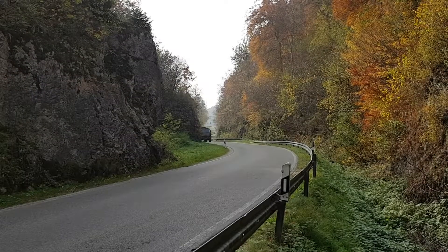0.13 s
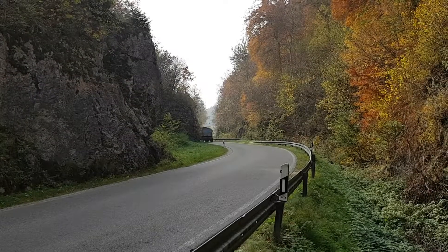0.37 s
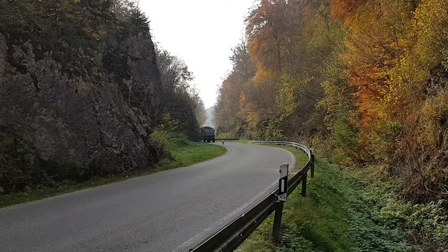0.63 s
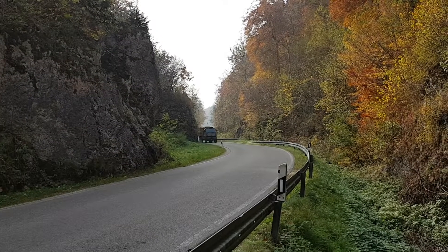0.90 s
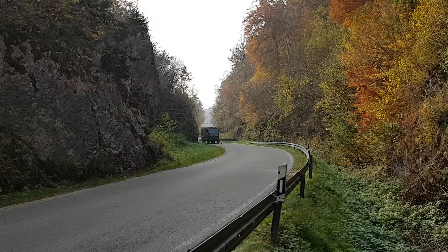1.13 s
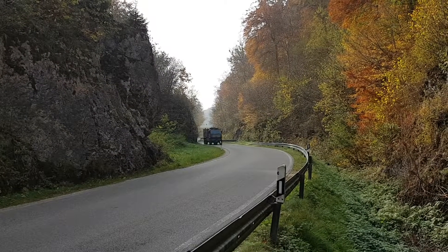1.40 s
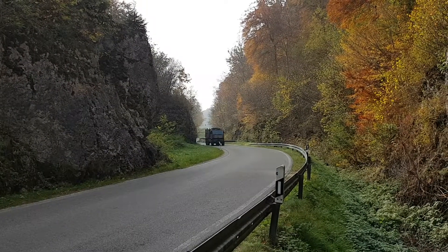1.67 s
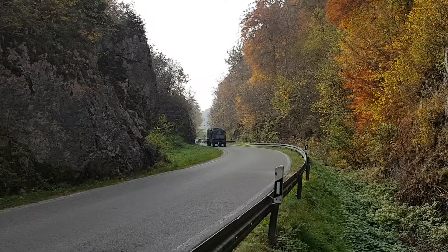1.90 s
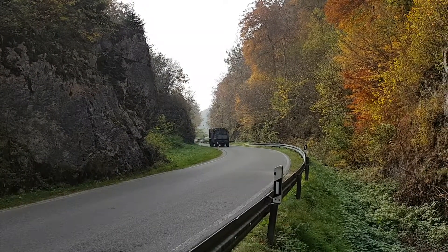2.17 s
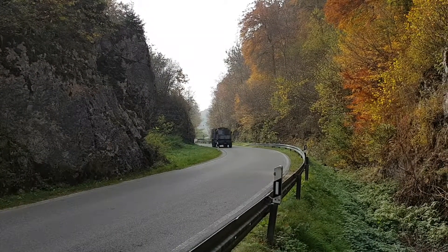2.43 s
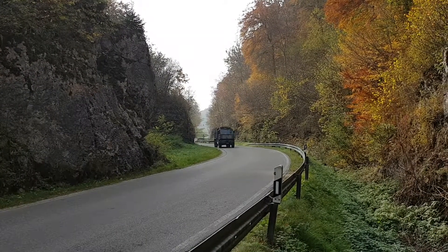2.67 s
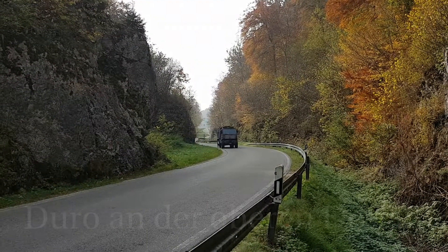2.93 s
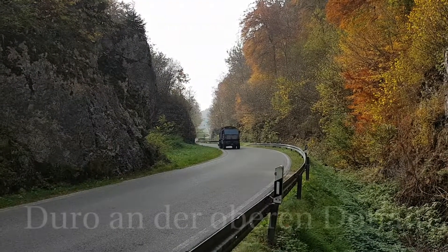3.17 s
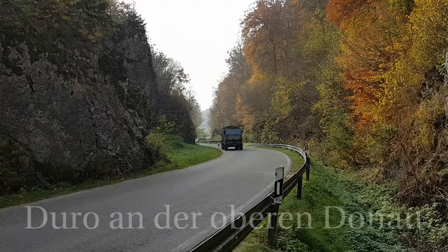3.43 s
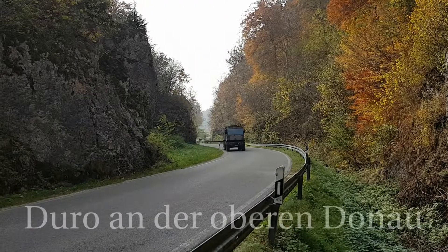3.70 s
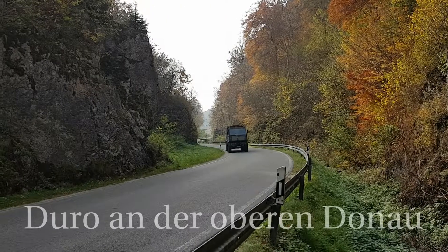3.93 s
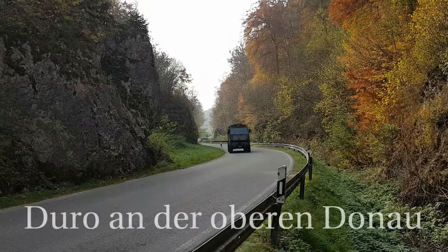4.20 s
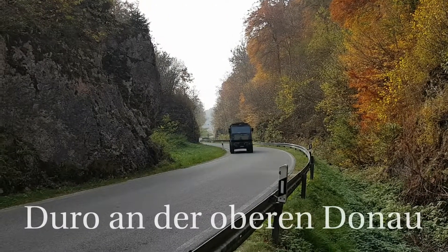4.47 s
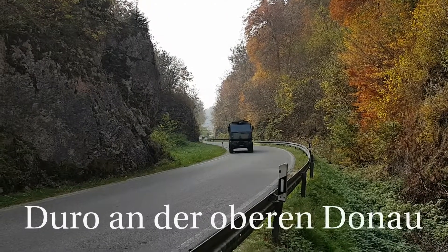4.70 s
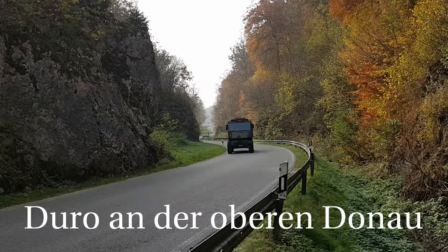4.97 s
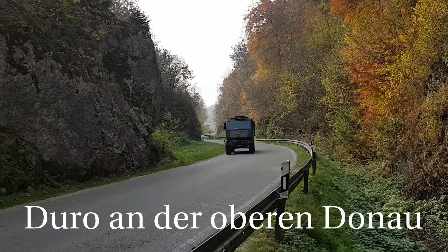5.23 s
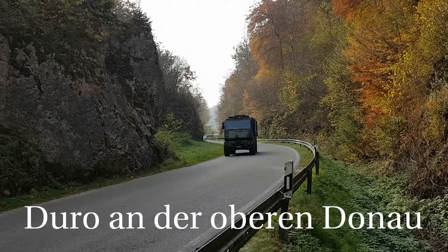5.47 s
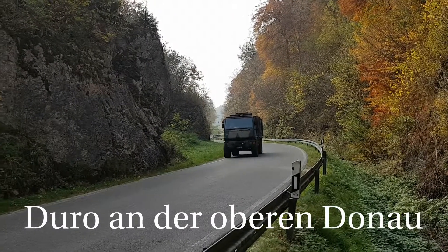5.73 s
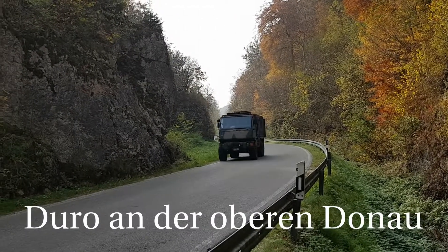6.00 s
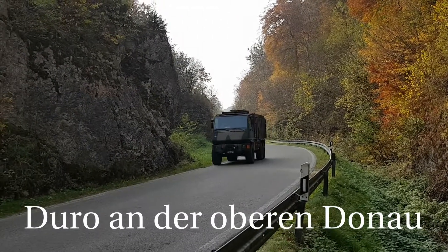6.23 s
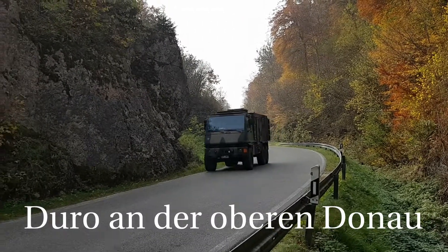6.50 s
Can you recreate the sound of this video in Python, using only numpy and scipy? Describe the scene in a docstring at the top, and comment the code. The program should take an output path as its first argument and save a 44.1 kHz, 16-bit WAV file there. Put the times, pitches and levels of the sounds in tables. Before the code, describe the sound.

A heavy diesel truck nears along a wooded road, tyre hum and roar swelling, sagging in pitch through a bend, then rising again.

```python
"""A roadside at a bend beside a rock face: a heavy diesel truck on block-tread tyres comes toward a microphone.
It eases off in the bend and pulls away again. Tread hum and exhaust note are sines that sag and rise together;
a fan drones at constant speed. Road roar and engine clatter are shaped noise that swells as the truck nears,
with a weak echo. Two small ticks sound close by, over a faint breeze and the hiss of the microphone."""
import sys
import numpy as np
from scipy import signal
from scipy.fft import rfft, irfft
from scipy.io import wavfile

SR = 44100
rng = np.random.default_rng(int(sys.argv[2]) if len(sys.argv) > 2 else 0)


def dump(signal):
    """Clip the signal to [-1, 1] and save it as 16-bit WAV at the path in sys.argv[1]."""
    limited = np.clip(np.atleast_2d(signal).T, -1, 1)
    pcm = np.round(limited * 32767).astype(np.int16)
    wavfile.write(sys.argv[1], SR, pcm)


def how_loud(loudness_db):
    """Turn decibels into a plain amplitude multiplier (0 dB gives 1, 20 dB gives 10)."""
    steps = np.asarray(loudness_db, float) / 20
    return 10 ** steps


N = 291942  # length in samples


def curves(rows):
    """Turn the columns of a table into curves in time; the first column is the time in seconds."""
    time_s, *columns = np.transpose(rows)
    return [np.interp(np.arange(N) / SR, time_s, column) for column in columns]


def rms_one(x):
    """Scale to unit rms."""
    return x / np.sqrt(np.mean(x ** 2) + 1e-20)


def wander(rate_hz):
    """Slow random curve with spread 1: noise through two equal one-pole low-passes."""
    step = 40  # samples between computed points
    settle = 4000  # points thrown away while the filter settles
    pole = np.exp(-2 * np.pi * rate_hz * step / SR)
    white = rng.standard_normal(N // step + settle + 2)
    slow = signal.lfilter([1], [1, -2 * pole, pole * pole], white)[settle:]
    return np.interp(np.arange(N) / step, np.arange(len(slow)), rms_one(slow))


def noise(spectrum):
    """White noise given the shape of a spectrum table, at unit rms."""
    hz, db = np.transpose(spectrum)
    bins_hz = np.maximum(np.arange(N // 2 + 1) * SR / N, 1)
    shape = how_loud(np.interp(np.log(bins_hz), np.log(hz), db, left=-90, right=-90))
    return rms_one(irfft(rfft(rng.standard_normal(N)) * shape, N))


def bump(center_s, lift_db, spread_s):
    """A bell-shaped change of level in dB."""
    distance = (np.arange(N) / SR - center_s) / spread_s
    return lift_db * np.exp(-0.5 * distance ** 2)


def bumps(rows):
    """All level changes of a table, added up in dB."""
    return sum(bump(*row) for row in rows)


def partial(turns, multiple, db, flutter_db, wobble_rad):
    """One sine of a rotating part; air and echoes make its height and phase waver."""
    phase = 2 * np.pi * (multiple * turns + rng.random()) + wobble_rad * wander(4.6)
    level = how_loud(db + flutter_db * wander(6.5))
    return np.sqrt(2) * level * np.sin(phase)  # the root turns an rms level into a peak


def orders(turns, rows, swells, swing_db, flutter_db, wobble_rad):
    """Multiples of one rotation, each following the approach and its own swells."""
    out = np.zeros(N)
    for multiple, db, follows in rows:
        own_swells = [(s, lift, spread) for s, line, lift, spread in swells if line == multiple]
        line_db = db + follows * swing_db + bumps(own_swells)
        out += partial(turns, multiple, line_db, flutter_db, wobble_rad)
    return out


# Wooded cutting in a light, steady breeze: pitch_hz [Hz], relative level_db [dB per Hz]
BREEZE_SPECTRUM = [(15, -5.5), (30, -5.5), (50, -6), (100, -13), (300, -27.5)]


def breeze():
    """The cutting stirs: low noise at a constant level."""
    return how_loud(-63.5) * noise(BREEZE_SPECTRUM)


# Snaps near the microphone: start_s [s], level_db [dB], pitch_hz [Hz], width_hz [Hz]
NEAR_TICKS = [(4.0362, -32.5, 5500, 1900), (4.1898, -35, 7300, 2600)]


def ticks():
    """Each tick is a very short snap: a broad resonance with weaker, higher partners."""
    out, t = np.zeros(N), np.arange(300) / SR
    for start_s, level_db, pitch_hz, width_hz in NEAR_TICKS:
        decay = np.pi * width_hz * t
        shape = decay * np.exp(1 - decay)  # quick rise, then fall
        ring = np.zeros(len(t))
        for ratio, size in [(1, 0.7), (1.28, 0.35), (1.6, 0.08)]:
            ring += size * np.sin(2 * np.pi * ratio * pitch_hz * t)
        at = round(start_s * SR)
        out[at:at + len(t)] += how_loud(level_db) * shape * ring
    return out


# Resonances of engine block and cab panels: pitch_hz [Hz], width_hz [Hz], lift_db [dB]
PANEL_RESONANCES = [(2090, 41, 2.5), (2430, 150, 1), (4300, 79, 1), (4720, 90, 1), (6000, 140, 2),
                    (7750, 130, -1.5)]


def panels(x):
    """Each resonance lifts a narrow band of the noise, or cuts it where the lift is negative."""
    for pitch_hz, width_hz, lift_db in PANEL_RESONANCES:
        b, a = signal.iirpeak(pitch_hz, pitch_hz / width_hz, fs=SR)
        x = x + (how_loud(lift_db) - 1) * signal.lfilter(b, a, x)
    return x


def rock_face(x):
    """A weak echo whose lag wanders, so that it combs the noise in a shifting pattern."""
    lag = 0.002387 * SR * (1 + 0.14 * wander(0.42))  # in samples, about 2.4 ms
    echo = np.interp(np.arange(N) - lag, np.arange(N), x)
    return x + how_loud(-16) * echo


# Low road rumble: pitch_hz [Hz], relative level_db [dB per Hz]
RUMBLE_SPECTRUM = [(25, -31), (50, -19), (80, -9.5), (130, -6.5), (160, -3.5), (220, 2), (330, -4.5),
                   (420, -5.5), (600, -46)]
# The rumble swells or thins out: center_s [s], lift_db [dB], spread_s [s]
RUMBLE_CHANGES = [(.5, 1.5, .5), (1.9, 1.5, .3), (3.2, -1, 0.61), (5.05, 1.5, 0.072), (6.3, 1.5, 0.27)]


def rumble(tyre_swing_db, engine_swing_db):
    """Low noise that follows both the tyres and the engine bay."""
    level_db = -40 + 0.62 * tyre_swing_db + 0.41 * engine_swing_db
    level_db = level_db + bumps(RUMBLE_CHANGES) + 0.89 * wander(6.0)
    return how_loud(level_db) * noise(RUMBLE_SPECTRUM)


# Road roar: pitch_hz [Hz], relative level_db [dB per Hz]
ROAR_SPECTRUM = [(250, -41.5), (340, -9.5), (400, -2), (650, 1), (950, -2), (1080, -7), (1400, -14.5),
                 (2000, -52)]
# Tread hiss: pitch_hz [Hz], relative level_db [dB per Hz]
HISS_SPECTRUM = [(700, -30), (950, -12.5), (1200, -0.5), (1450, -3.5), (1700, -7), (2000, -20), (2500, -38)]
# The hiss swells or thins out: center_s [s], lift_db [dB], spread_s [s]
HISS_CHANGES = [(.5, 1.5, .3), (1.75, -2, .25), (2.9, 1, 0.34), (4.4, 3, 0.28), (5.5, -2, 0.32)]


def roar_and_hiss(tyre_swing_db, engine_swing_db):
    """Rubber on road: two bands of noise that waver together."""
    gust = wander(3.0)
    roar_db = -35 + 0.94 * tyre_swing_db + 0.065 * engine_swing_db + 0.82 * gust
    hiss_db = -43.5 + 0.68 * tyre_swing_db + 0.43 * engine_swing_db + 0.5 * gust
    hiss_db = hiss_db + bumps(HISS_CHANGES)
    return how_loud(roar_db) * noise(ROAR_SPECTRUM) + how_loud(hiss_db) * noise(HISS_SPECTRUM)


# Combustion clatter: pitch_hz [Hz], relative level_db [dB per Hz]
CLATTER_SPECTRUM = [(1500, -15), (1850, 0), (2200, -5), (2600, -2), (3000, -7), (3400, -10), (3800, -16.5),
                    (4400, -39)]
# Sizzle above the clatter: pitch_hz [Hz], relative level_db [dB per Hz]
SIZZLE_SPECTRUM = [(3200, -26.5), (3900, -0.5), (4600, 1), (5200, -2.5), (5900, -8.5), (6600, -18),
                   (7400, -32)]
# The sizzle swells or thins out: center_s [s], lift_db [dB], spread_s [s]
SIZZLE_CHANGES = [(.6, 0, .4), (1.9, 1, .4), (3.4, 0, .4), (5.5, -1.5, .35), (6.5, 2, 0.17)]


def clatter_and_sizzle(firings, tyre_swing_db, engine_swing_db):
    """Two bands of noise that pulse a little with each firing."""
    knock = 1 + 0.042 * np.cos(2 * np.pi * firings)
    clatter_db = -47 + 0.05 * tyre_swing_db + 0.97 * engine_swing_db + 0.43 * wander(10.0)
    sizzle_db = -58 + 0.05 * tyre_swing_db + 1.01 * engine_swing_db + bumps(SIZZLE_CHANGES)
    return knock * (how_loud(clatter_db) * noise(CLATTER_SPECTRUM) + how_loud(sizzle_db) * noise(SIZZLE_SPECTRUM))


# Highest treble: pitch_hz [Hz], relative level_db [dB per Hz]
GRIT_SPECTRUM = [(5200, -27), (6000, -3), (6800, 0.5), (7800, -0.5), (9000, -5), (9800, -11),
                 (10400, -19.5), (12500, -20), (15700, -26)]
# It clears and dulls along the way: time_s [s], lift_db [dB, before the share taken below]
TREBLE_CLEARNESS = [(0, -0.5), (.8, -1), (1.8, 0.5), (2.6, 0.7), (3.3, -1.5), (3.9, -2), (4.4, 0.3),
                    (4.7, 1), (5.3, 1.5), (5.8, 1.5), (5.95, -0.5), (6.3, 1), (6.62, 1)]


def grit(tyre_swing_db, engine_swing_db):
    """Faint treble noise that follows the engine bay and clears and dulls."""
    clear_db, = curves(TREBLE_CLEARNESS)
    level_db = -68.5 + 0.05 * tyre_swing_db + 1.07 * engine_swing_db + 0.99 * clear_db
    return how_loud(level_db) * noise(GRIT_SPECTRUM)


def broadband(firings, tyre_swing_db, engine_swing_db):
    """All noise of road and engine, coloured by the panels and echoed by the rock."""
    layers = rumble(tyre_swing_db, engine_swing_db)
    layers = layers + roar_and_hiss(tyre_swing_db, engine_swing_db)
    layers = layers + clatter_and_sizzle(firings, tyre_swing_db, engine_swing_db)
    layers = layers + grit(tyre_swing_db, engine_swing_db)
    return rock_face(panels(layers))


# Fan lines: multiple [of blade rate], level_db [dB at mid approach], follows [share of the tyre swing]
FAN_LINES = [(1, -49.5, 0.5), (2, -51, .5), (3, -50, 1.0), (4, -50.5, 0.64)]
# Single lines swell: center_s [s], multiple [of blade rate], lift_db [dB], spread_s [s]
FAN_LINE_SWELLS = [(.75, 1, 8.5, 0.33), (1.8, 1, 6.3, 0.19), (3.25, 1, 9.5, 0.22), (5.1, 1, 4.5, 0.58),
                   (1.5, 2, 16, 0.083), (1.72, 2, 7.3, .08), (2.1, 2, 11, 0.096), (2.77, 2, 11.2, 0.056),
                   (3.93, 2, 7.4, .1), (5.0, 2, 12, 0.068), (5.3, 2, 8.4, .2), (5.62, 2, 14, 0.078),
                   (5.87, 2, 17.7, 0.071), (6.37, 2, 17, 0.061), (3.0, 3, 5.4, .15), (3.9, 3, 7, 0.31),
                   (5.1, 3, 7, .4), (1.5, 4, 7.6, 0.12), (3.4, 4, 6.7, 0.14), (6.0, 4, 9.6, .45)]


def fan(swing_db):
    """Blade rate and three overtones, unsteady in the turbulent inflow."""
    blades = 91.26 * np.arange(N) / SR  # blade rate in Hz, constant
    return orders(blades, FAN_LINES, FAN_LINE_SWELLS, swing_db, flutter_db=2.0, wobble_rad=0.46)


# Firing note, following load and where the pipe points: time_s [s], level_db [dB]
FIRING_NOTE = [(0, -53), (.6, -50), (.75, -57), (.88, -49), (1.1, -53), (1.38, -45), (1.75, -44),
               (1.9, -56), (2.25, -59), (2.48, -44), (2.7, -59), (3.0, -45), (3.2, -52), (3.4, -46),
               (4.0, -48.5), (4.5, -34.5), (4.65, -40), (4.87, -37), (5.0, -43.5), (5.37, -34),
               (5.6, -35.5), (6.2, -23), (6.4, -25), (6.62, -37)]
# Higher lines: multiple [of firing rate], level_db [dB at mid approach], follows [share of the tyre swing]
EXHAUST_LINES = [(1.5, -52, 0.4), (2, -55, 0.42)]
# Single lines swell: center_s [s], multiple [of firing rate], lift_db [dB], spread_s [s]
EXHAUST_LINE_SWELLS = [(0.83, 1.5, 7, 0.25), (5.3, 1.5, 4, .4), (0.55, 2, 6.2, .4), (4.5, 2, 6, .3),
                       (5.26, 2, 8, 0.27), (6.0, 2, 8, .2), (6.48, 2, 20.7, 0.2), (1.431, 2, 5.8, .15)]


def exhaust(firings, swing_db):
    """Firing note of six cylinders; unequal pipes add a half order."""
    note_db, = curves(FIRING_NOTE)
    note = partial(firings, 0.99, note_db, flutter_db=0.5, wobble_rad=0.11)
    return note + orders(firings, EXHAUST_LINES, EXHAUST_LINE_SWELLS, swing_db, flutter_db=0.5, wobble_rad=0.2)


# The hum dips briefly: center_s [s], lift_db [dB], spread_s [s]
HUM_DIPS = [(3.5, -31, 0.078), (4.36, -14, 0.079)]
# Overtones: multiple [of block rate], level_db [dB at mid approach], follows [share of the tyre swing]
TREAD_LINES = [(2, -45, 0.65), (3, -45.5, 0.64), (4, -48.5, 0.96)]
# Single lines swell or fade: center_s [s], multiple [of block rate], lift_db [dB], spread_s [s]
TREAD_LINE_SWELLS = [(.15, 3, -20, 0.28), (2.4, 3, 2, 0.58), (3.6, 2, 4, 0.21), (4.36, 2, 2.5, 0.21),
                     (5.2, 4, 5, 0.4), (5.7, 2, -9, .2), (5.44, 3, 4, 0.35), (1.14, 4, 5, .15),
                     (4.1, 3, -1.5, .2), (7.7, 3, 6.5, 0.13), (4.3, 4, -3.5, 0.37), (1.2, 3, -1, .3),
                     (6.0, 3, -6, .12), (0.33, 2, -4.5, 0.46)]


def tyres(blocks, hum_db, swing_db):
    """Tread blocks slap the asphalt in step with road speed: a hum and its overtones."""
    hum = partial(blocks, 1, hum_db + bumps(HUM_DIPS), flutter_db=0.15, wobble_rad=0.27)
    return hum + orders(blocks, TREAD_LINES, TREAD_LINE_SWELLS, swing_db, flutter_db=0.6, wobble_rad=0.37)


def gearbox(blocks, engine_swing_db):
    """A whine at 7.3 cycles per tread block, so it glides with the road speed."""
    whine_db = -58.5 + 1.27 * engine_swing_db + bump(5.5, lift_db=12, spread_s=0.18)
    return partial(blocks, 7.3, whine_db, flutter_db=3.0, wobble_rad=2.6)


# Road speed: time_s [s], block_rate_hz [tread blocks per second]
ROAD_SPEED = [(0, 237), (.6, 236.2), (.85, 235.9), (1.0, 235), (1.6, 233.3), (1.9, 233.8), (2.5, 229.9),
              (2.8, 227.6), (3.05, 229), (3.4, 217.7), (3.75, 208.4), (4.0, 204.5), (4.13, 206.4),
              (4.62, 227), (5.0, 236.3), (5.3, 238.1), (5.75, 238.7), (6.12, 246.3), (6.38, 246.6),
              (6.62, 249.5)]
# Approach as heard: time_s [s], tyres_db [dB], engine_bay_db [dB], tread_hum_db [dB]
APPROACH_LEVELS = [(0, -48.5, -55, -45.5), (.5, -45.5, -51, -42), (.85, -43.5, -49.5, -43.5),
                   (1.2, -42.5, -48, -38.5), (1.55, -40.5, -48.5, -37.5), (1.95, -38, -49.5, -36.5),
                   (2.5, -35.5, -48.5, -35.5), (2.9, -34.5, -47, -33.5), (3.15, -33.5, -46.5, -34),
                   (3.7, -34.5, -47, -34), (4.3, -32.5, -46, -34), (4.62, -31.5, -44.5, -30),
                   (5.1, -29.5, -43, -24.5), (5.5, -29, -41, -25.5), (5.83, -27, -40.5, -22.5),
                   (5.95, -25.5, -36.5, -26), (6.27, -25, -36, -21.5), (6.48, -23.5, -35, -19.5),
                   (6.62, -24.5, -33, -22)]


def scene():
    """Wheels and engine are locked by the gear, so one speed drives both."""
    block_hz, = curves(ROAD_SPEED)
    tyres_db, engine_db, hum_db = curves(APPROACH_LEVELS)
    tyre_swing_db = tyres_db + 35  # against -35 dB at mid approach
    engine_swing_db = engine_db + 47  # against -47 dB at mid approach
    blocks = np.cumsum(block_hz) / SR
    firings = 0.3035 * blocks  # firings per tread block
    background = breeze() + ticks()
    truck = broadband(firings, tyre_swing_db, engine_swing_db)
    truck = truck + fan(tyre_swing_db) + exhaust(firings, tyre_swing_db)
    truck = truck + tyres(blocks, hum_db, tyre_swing_db) + gearbox(blocks, engine_swing_db)
    return (background + truck)[None]


# Hiss of the microphone: pitch_hz [Hz], relative level_db [dB per Hz]
MICROPHONE_SPECTRUM = [(2000, 1), (6000, 0), (10000, 0), (14000, 0), (15800, -1)]


def microphone(dry):
    """The microphone adds its own hiss and a small constant offset."""
    return dry + how_loud(-71) * noise(MICROPHONE_SPECTRUM) - 0.0016


def band_limit(x):
    """A steep low-pass at the top of the band."""
    return signal.sosfilt(signal.butter(12, 15720, fs=SR, output="sos"), x)


def record(dry):
    """The scene as it is picked up at the roadside."""
    heard = microphone(dry)
    return band_limit(heard)


dry = scene()
out = record(dry)
dump(out)
```